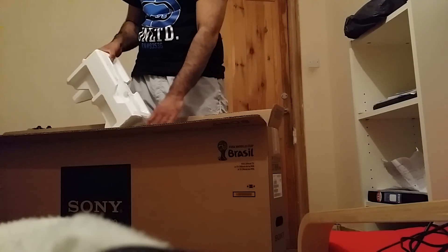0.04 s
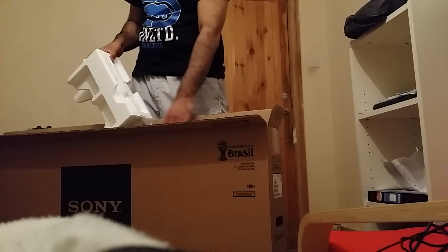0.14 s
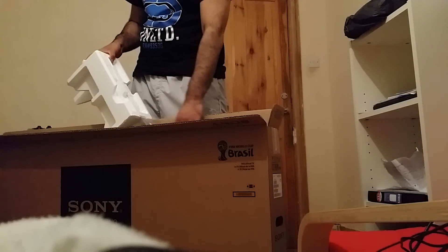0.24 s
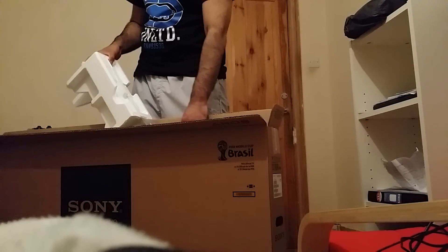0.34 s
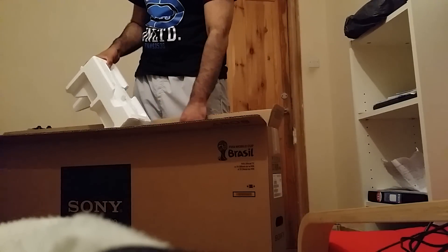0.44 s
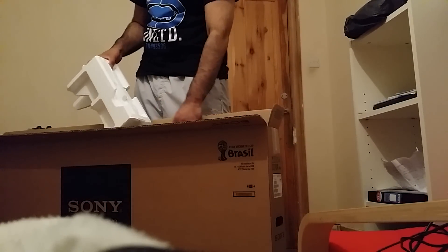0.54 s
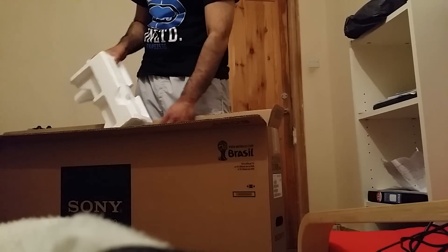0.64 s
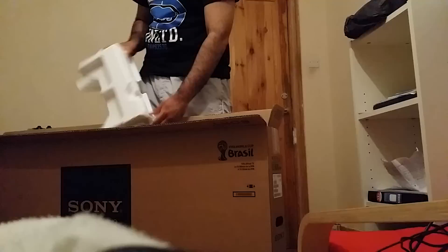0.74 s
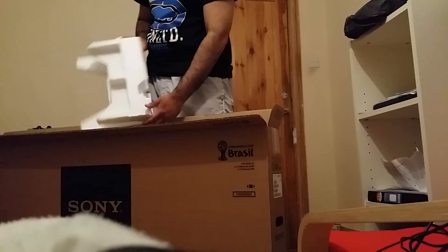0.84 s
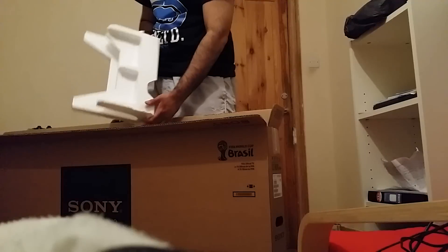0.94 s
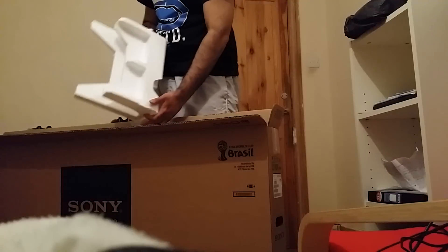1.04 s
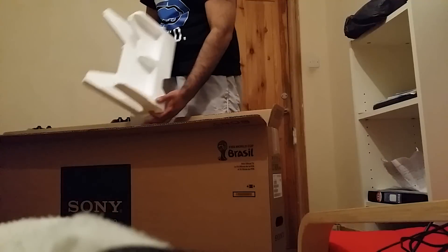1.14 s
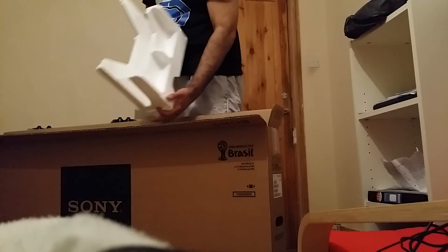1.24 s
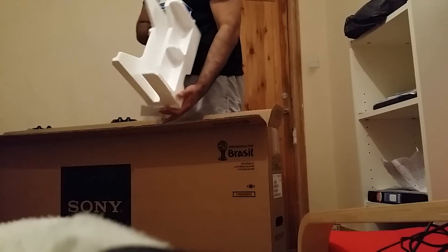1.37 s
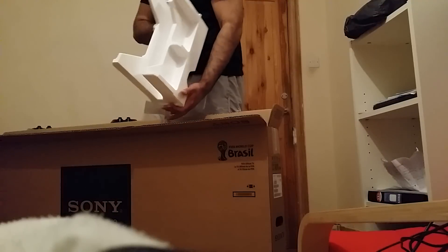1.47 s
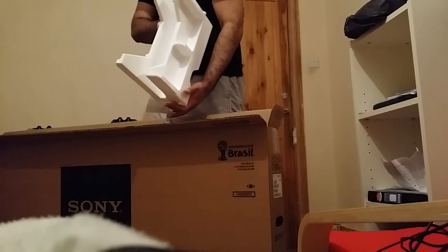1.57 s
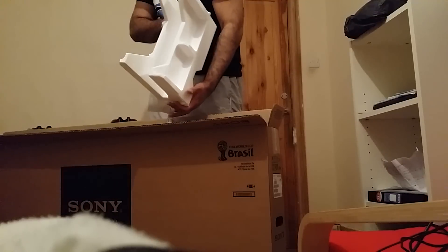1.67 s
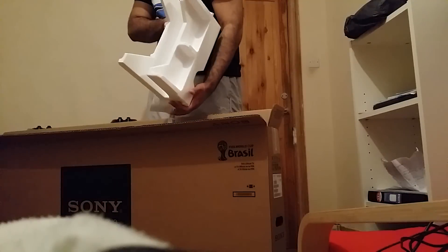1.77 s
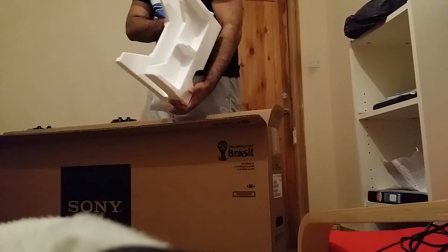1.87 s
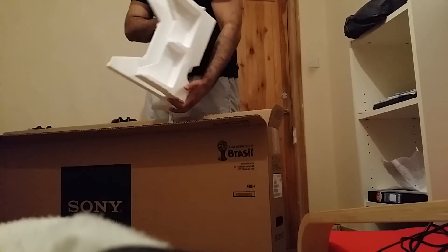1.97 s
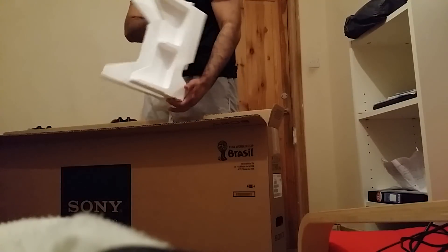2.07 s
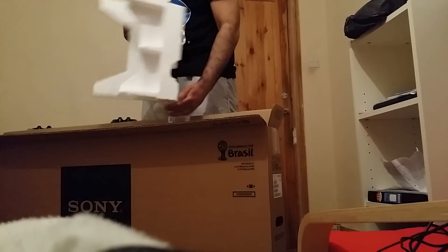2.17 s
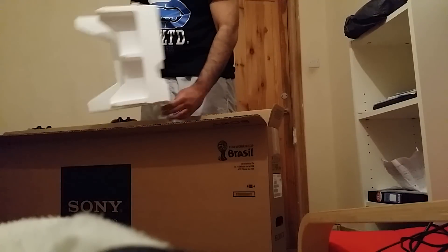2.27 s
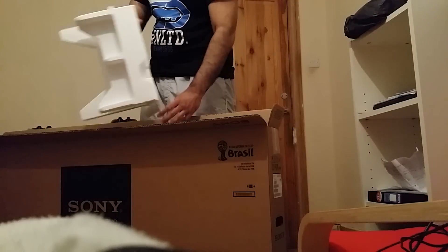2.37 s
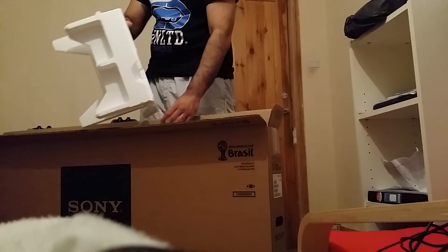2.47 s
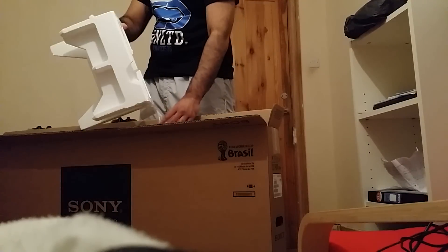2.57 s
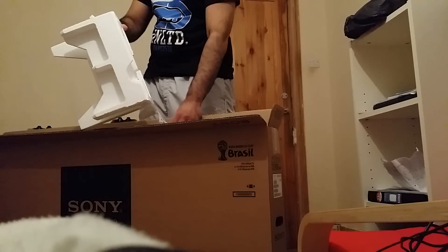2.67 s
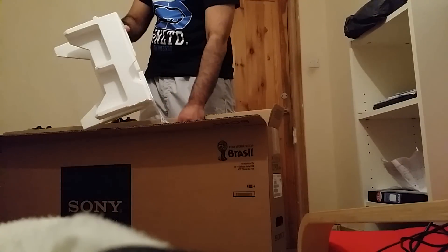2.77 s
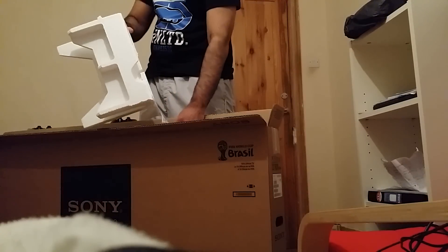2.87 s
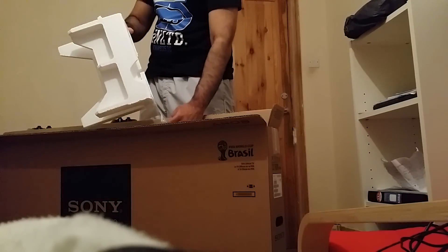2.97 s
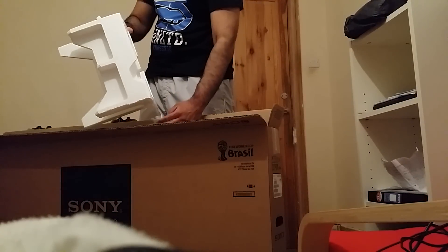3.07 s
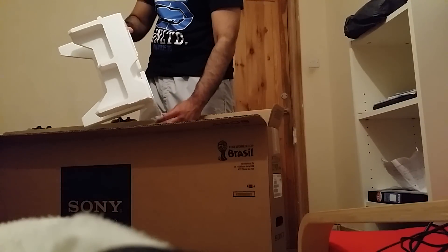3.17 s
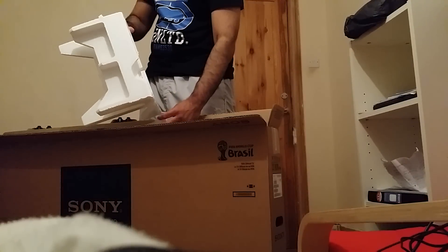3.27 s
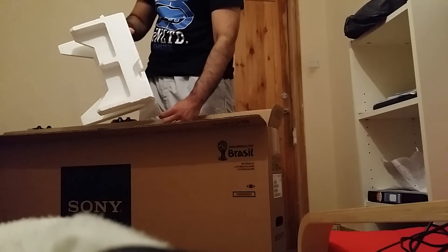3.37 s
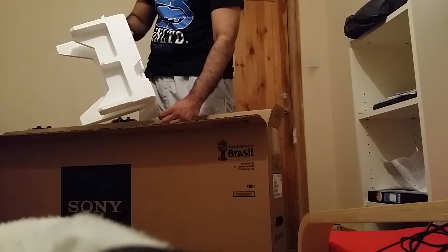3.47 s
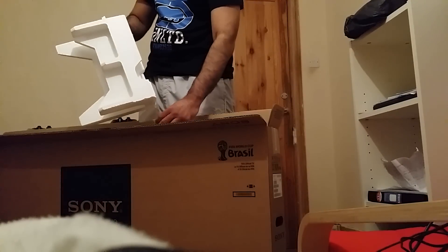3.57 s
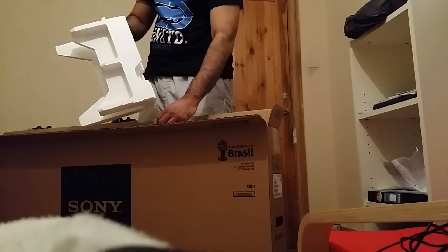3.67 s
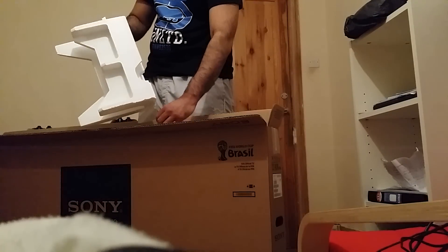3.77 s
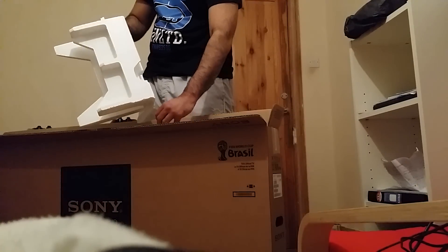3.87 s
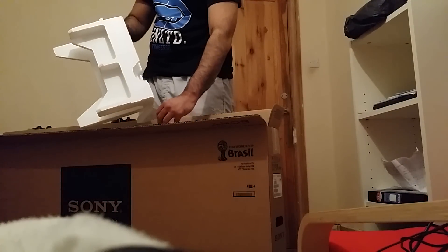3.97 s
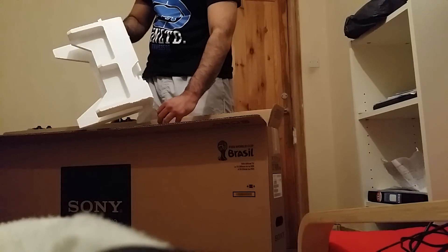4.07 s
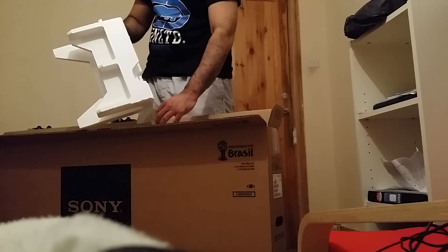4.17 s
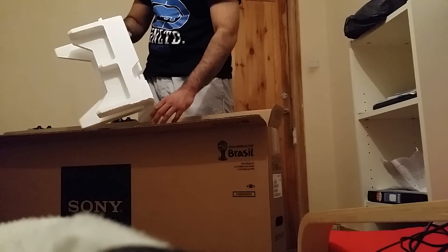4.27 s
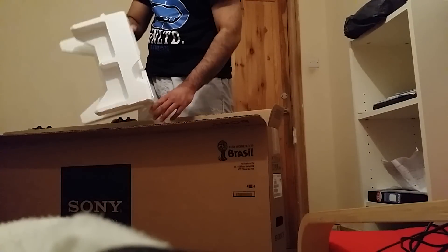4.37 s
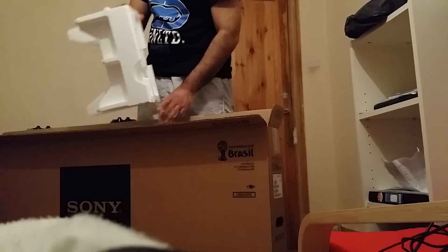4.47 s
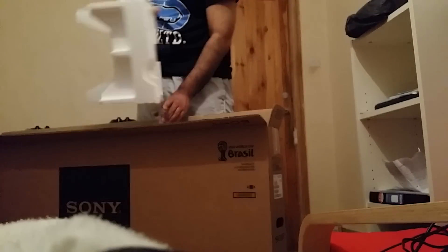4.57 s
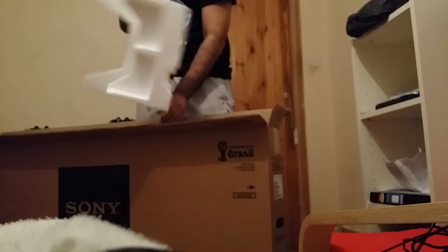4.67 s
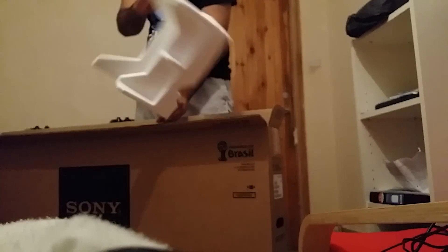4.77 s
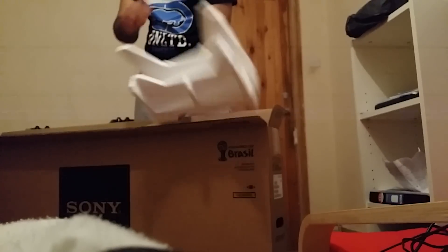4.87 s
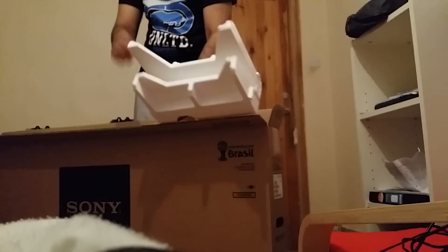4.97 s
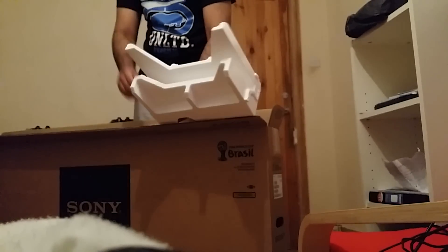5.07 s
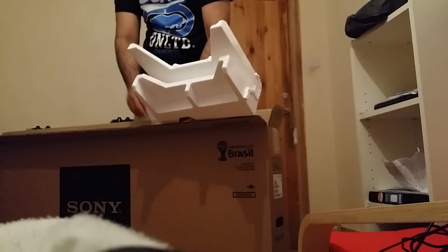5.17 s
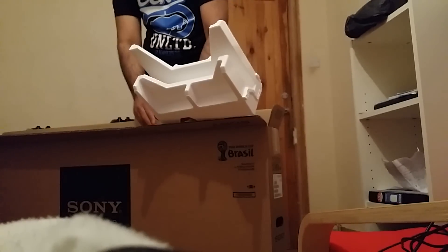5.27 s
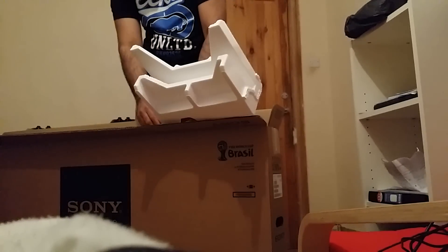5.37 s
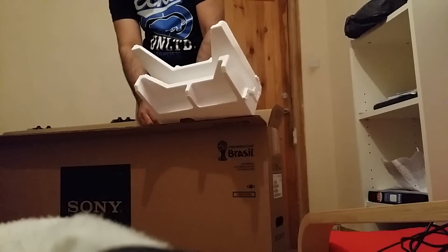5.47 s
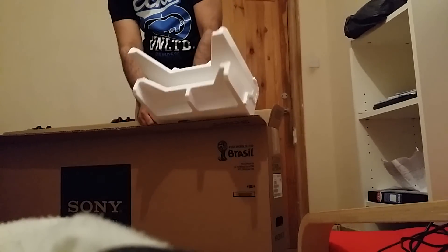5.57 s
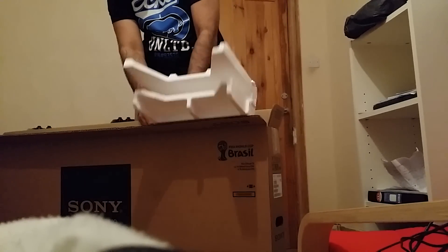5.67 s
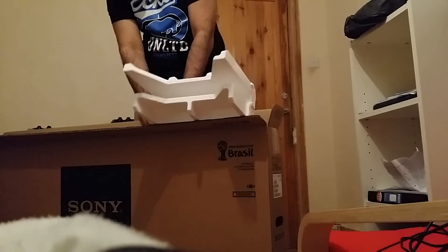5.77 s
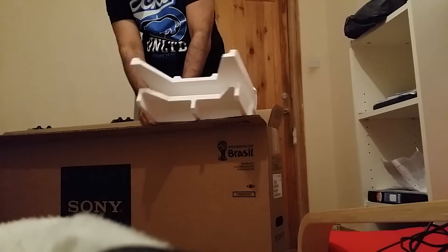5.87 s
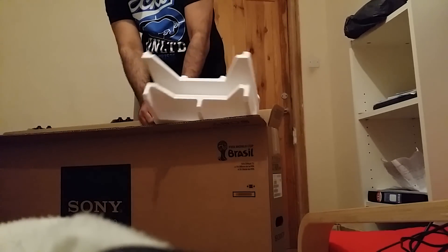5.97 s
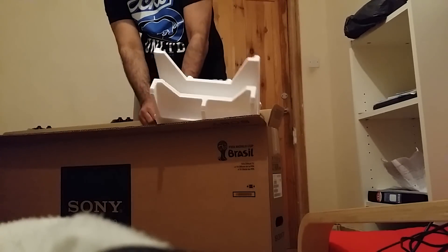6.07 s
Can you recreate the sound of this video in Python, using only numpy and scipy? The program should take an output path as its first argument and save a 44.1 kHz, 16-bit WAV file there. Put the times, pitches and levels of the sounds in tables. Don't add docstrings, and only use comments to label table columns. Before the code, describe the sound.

Dry foam handling: faint skin hiss and creaks first, then jerky scrapes over a cardboard rim, scattered sharp slaps and ticks, and brief rough squeaks. A pause of near quiet, more dragging, then a loud double knock of light foam on a hollow box with quick rebounds. Light hissing strokes follow. Small lively room, heard from a few metres, faint background air.

```python
import sys
import numpy as np
from scipy import signal
from scipy.fft import rfft, irfft, next_fast_len
from scipy.io import wavfile
from scipy.ndimage import uniform_filter1d, map_coordinates

SR = 44100
rng = np.random.default_rng(int(sys.argv[2]) if len(sys.argv) > 2 else 0)


def linear_from_db(decibels):
    return 10 ** (np.asarray(decibels, float) / 20)


def int16_out(signal):
    q = np.round(np.clip(np.atleast_2d(signal).T, -1, 1) * 32767)
    wavfile.write(sys.argv[1], SR, q.astype(np.int16))


N = 270050


def unit(x):
    return x / np.sqrt(np.mean(x ** 2))


def low_cut(x, order, hz):
    return signal.sosfilt(signal.butter(order, hz, "high", fs=SR, output="sos"), x)


def colour(x, points):
    size = next_fast_len(x.shape[-1])
    hz, db = np.transpose(points)
    bins_hz = np.maximum(np.fft.rfftfreq(size, 1 / SR), 1)
    gain = linear_from_db(np.interp(np.log(bins_hz), np.log(np.maximum(hz, 1)), db))
    return irfft(rfft(x, size) * gain, size)[..., :x.shape[-1]]


def ring(force, hz, t60_s):
    r = np.exp(-np.log(1000) / (max(t60_s, .002) * SR))
    w = 2 * np.pi * hz / SR
    return signal.lfilter([0, 2 * np.sqrt(1 - r) * np.sin(w)], [1, -2 * r * np.cos(w), r * r], force)


def walk(rate_hz):
    k = int(SR / rate_hz)
    held = np.repeat(rng.standard_normal(N // k + 1), k)
    return 1.22 * uniform_filter1d(uniform_filter1d(held, k), k)[:N]


def slips(rate_hz, spread_db, bed, judder_db):
    when, sign, size = rng.random((3, N))
    size_db = spread_db * np.minimum(-np.log(1 - size), 4.5)
    clicks = (when < rate_hz / SR) * np.sign(sign - .5) * linear_from_db(size_db)
    rough = unit(clicks) + bed * rng.standard_normal(N)
    return unit(rough * linear_from_db(judder_db * walk(45)))


# firm from in seconds, held in seconds, foam body in dB, centre of the ringing in Hz,
# skin hiss over body in dB.
SLIDES = [(0.0, 0.077, -59, 800, 0.5), (.22, 0.064, -60, 800, -11), (3.365, 0.014, -59, 900, 6.5),
          (.36, 0.16, -59, 704, 1.5), (.5, 0.037, -55.5, 800, 6.5), (.69, 0.018, -49.5, 770, 6),
          (.82, 0.2, -41.5, 560, 0.5), (1.13, .07, -62, 900, 10), (1.32, 0.17, -40.5, 940, 3.5),
          (1.55, 0.18, -49, 750, 4.5), (1.79, 0.12, -45.5, 830, 3.5), (1.98, 0.088, -43.5, 915, 5),
          (2.17, 0.048, -44.5, 670, 3.5), (2.3, 0.16, -46, 930, -2), (2.6, 0.061, -42.5, 900, -2),
          (2.72, 0.34, -49, 800, 0.5), (3.47, 0.13, -41.5, 860, -2.5), (3.75, 0.15, -58.5, 760, 5.5),
          (4.05, 0.16, -56.5, 750, 3), (4.25, 0.24, -47.5, 910, 0), (4.5, 0.044, -48, 1800, 0.5),
          (4.61, 0.026, -44, 850, 1), (4.71, 0.13, -41.5, 915, 3), (5.33, 0.052, -55, 1600, 4.5),
          (5.53, 0.33, -50.5, 1600, 6), (5.9, 0.13, -53, 890, -0.5)]
SLIDE_RISE_DB_S, SLIDE_FALL_DB_S = 124, 146
SLIDE_RASP_DB, SLIDE_BOOM_DB = -5, -11
# firm from in seconds, held in seconds, foam body in dB, centre of the ringing in Hz,
# box boom over body in dB.
DRAGS = [(.15, 0.026, -54, 990, -8), (.77, 0.11, -48.5, 555, -1), (0.919, 0.01, -43.5, 560, 11),
         (1.001, 0.028, -36.5, 1050, -3), (2.468, 0.01, -32.5, 890, -15), (2.539, 0.01, -31, 1040, -34),
         (3.132, 0.023, -28.5, 950, -23), (4.24, 0.011, -49, 1130, -4), (4.47, 0.059, -39.5, 476, -17),
         (5.018, 0.035, -36, 720, 6.5), (5.1, .12, -45.5, 400, -3)]
DRAG_RISE_DB_S, DRAG_FALL_DB_S = 319, 339
DRAG_RASP_DB, DRAG_HISS_DB = -6.5, -4.5


def handling():
    t = np.arange(0, N + 64, 64) / SR
    power = np.full((5, len(t)), 1e-12)  # body, rasp, hiss, boom, power-weighted Hz
    strokes = []
    for *stroke, hiss_db in SLIDES:
        layers_db = (0, SLIDE_RASP_DB, hiss_db, SLIDE_BOOM_DB)
        strokes.append((stroke, SLIDE_RISE_DB_S, SLIDE_FALL_DB_S, layers_db))
    for *stroke, boom_db in DRAGS:
        layers_db = (0, DRAG_RASP_DB, DRAG_HISS_DB, boom_db)
        strokes.append((stroke, DRAG_RISE_DB_S, DRAG_FALL_DB_S, layers_db))
    for (s, held_s, db, hz), rise, fall, layers_db in strokes:
        press_db = db - rise * np.maximum(s - t, 0) - fall * np.maximum(t - s - held_s, 0)
        power += np.append(linear_from_db(layers_db) ** 2, hz)[:, None] * linear_from_db(2 * press_db)
    place_hz = np.maximum(power[4] / power[0], 300)
    controls = [*10 * np.log10(power[:4]), place_hz]
    return [np.interp(np.arange(N) / SR, t, c) for c in controls]


# start in seconds, peak in dB, ringing centre in Hz, crackle in dB.
SLAPS = [(0.124, -30, 1000, -12), (0.293, -48, 1090, -6), (0.308, -42.5, 1100, -8), (0.347, -46, 780, -3.5),
         (1.554, -18, 800, -10), (1.661, -30.5, 744, -10.5), (1.775, -18, 650, -12), (1.823, -25, 940, -38),
         (2.166, -35, 678, -7), (2.565, -31, 754, -29), (2.826, -39, 490, -3.5), (3.152, -13, 960, -8.5),
         (3.4055, -32.5, 935, -13), (3.682, -29.5, 856, -11.5), (4.149, -33.5, 727, -6.5),
         (5.852, -36.5, 1430, -29)]
# start in seconds, peak in dB, ringing centre in Hz, crackle in dB.
JERKS = [(0.539, -46.5, 1400, 5), (0.797, -20.5, 331, -30), (0.897, -20, 331, -6.5),
         (0.916, -27, 624, -4.5), (1.0, -22, 1390, -2.5), (1.024, -30.5, 1410, -2),
         (1.254, -31.5, 830, -11), (2.053, -31, 980, -10), (2.278, -23.5, 1510, -21),
         (2.337, -17, 930, -24), (2.366, -28, 990, -18), (2.672, -20, 625, -18), (2.459, -28.5, 886, -8),
         (2.537, -19.5, 2310, -10), (2.546, -15, 1240, -20), (2.953, -36, 890, -8),
         (3.636, -36.5, 1320, -3), (4.188, -34, 614, -8.5), (4.227, -34.5, 1040, -14),
         (4.842, -22, 1390, -2), (4.939, -27, 1500, -6), (4.974, -25, 1000, 4.5), (5.157, -28.5, 500, -8),
         (5.413, -62, 820, -8)]
# start in seconds, peak in dB, ringing centre in Hz, crackle in dB.
SKIDS = [(0.453, -45.5, 360, -1.5), (0.662, -36, 719, -3), (0.76, -37, 417, -23), (1.296, -35, 1010, -9),
         (1.459, -45, 845, -19), (2.48, -31, 590, -30), (3.078, -34, 1400, -14), (3.095, -21.5, 1680, -14),
         (3.52, -26, 890, -17), (3.955, -41.5, 579, -9), (4.395, -29, 453, -14), (4.43, -33.5, 420, -14),
         (4.49, -32, 1700, -8), (4.495, -33, 3400, -12), (4.695, -34.5, 1000, -2), (4.75, -30, 748, -10)]
# start in seconds, peak in dB, ringing centre
# in Hz, crackle in dB.
TAPS = [(2.482, -29, 600, -26), (2.446, -34, 904, -12), (3.473, -32, 830, -22), (3.084, -32, 1230, -20),
        (3.522, -38, 974, -22), (3.227, -32, 1000, -20), (3.571, -32, 820, -16), (3.59, -32.5, 470, -12),
        (3.828, -41, 930, -14), (2.674, -27, 730, -12), (2.343, -28, 730, -27), (2.375, -32.5, 670, -25),
        (1.781, -28, 900, -8), (4.056, -43, 500, -17), (3.159, -15, 4000, -10), (3.165, -23, 5100, -17),
        (3.096, -33.5, 1700, -5), (4.089, -43, 1200, -14), (2.556, -21, 2300, -16), (2.564, -24, 720, -16),
        (5.983, -42, 800, -8), (4.977, -31, 1200, -3), (6.072, -44, 2100, -8), (0.805, -34, 960, -12),
        (0.903, -32, 750, -10), (4.858, -27, 900, -8)]
SLAP_S, JERK_S, SKID_S = 0.0027, 0.0091, 0.02
BOOM_DB, BOOM_AT_DB, BOOM_GROWTH, BOOM_DB_PER_OCTAVE = -47.5, -32.5, 0.36, -7


def grips():
    rows = []
    for table, slip_s in ((SLAPS, SLAP_S), (JERKS, JERK_S), (SKIDS, SKID_S), (TAPS, SLAP_S)):
        for s, db, hz, crackle_db in table:
            boom_db = BOOM_DB + BOOM_GROWTH * (db - BOOM_AT_DB) + BOOM_DB_PER_OCTAVE * np.log2(hz / 800)
            rows.append((s, db, hz, crackle_db, boom_db - db, slip_s))
    return rows


SNAP_DB = 26


def bursts(db, chatter, snap_db=-60, lead_s=.001, spread_s=1e-5):
    out = np.zeros(N)
    t = np.arange(SR // 7) / SR
    splinters = rng.choice([-1, 1], (96, 128)) * np.exp(-t[:128] / spread_s)
    splinters *= splinters[:, :1] / np.linalg.norm(splinters, axis=1, keepdims=True)
    for (s, *_, slip_s), size, snap in zip(grips(), linear_from_db(db), splinters):
        i = int((s - lead_s) * SR)
        span_s = np.clip(slip_s, .001, .03)
        fade = np.exp(-t / span_s) * np.minimum(t / span_s ** 2 / 25, 1)
        out[i:i + len(t)] += size * chatter[i:i + len(t)] * fade[:N - i]
        out[i:i + len(snap)] += snap * size * linear_from_db(snap_db) * np.exp(-(span_s / .008) ** 4)
    return out


# frequency in Hz, level in dB, t60 in seconds.
FOAM = [(384, -1, 0.0061), (402, 4, 0.028), (477, -5, 0.049), (603.3, 0, 0.066), (678, -8.5, 0.049),
        (735, -0.5, 0.033), (866, -2, 0.023), (946, 1, 0.047), (1040, -0.5, 0.021), (1142, -0.5, 0.043),
        (1237, -2, 0.053), (1373, 1.5, 0.016), (1580, -1, 0.015), (1700, -1.5, 0.02), (1878, -2, 0.009),
        (2260, -7, 0.0045), (2700, -5, .004), (3170, -4.5, 0.003), (3880, -6, .0022)]


def foam(body_db, place_hz):
    _, peak_db, centre_hz, *_ = np.transpose(grips())
    rub = slips(1100, 2.6, .9, 2)
    catch = slips(4000, 2, 1.5, 0)
    out = 0
    for k, (hz, db, t60_s) in enumerate(FOAM):
        rub_db = body_db - 11.0 - 4.3 * np.abs(np.log2(hz / place_hz)) + 1.4 * walk(10)
        share_db = -9 * np.abs(np.log2(hz / centre_hz)) + 1.26 * rng.standard_normal(len(peak_db))
        force = rub * linear_from_db(rub_db) + bursts(peak_db + share_db - 11.5, catch, snap_db=SNAP_DB - 4)
        out = out + (-1) ** k * linear_from_db(db) * ring(force, hz, t60_s)
    return low_cut(out, 4, 290)


# frequency in Hz, density in dB per Hz.
RASP = [(1000, -22), (1700, 1.5), (2000, -6), (3020, -3.5), (4900, -16.5), (6370, -19), (10800, -120)]
HISS = [(2710, -10), (4600, -1), (6130, -1.5), (6700, 2), (8580, -3), (10700, -5.5), (14000, -10.5),
        (14600, -17), (15000, -38)]
CRACKLE = [(1100, -14), (1900, 0.5), (3500, 1), (5200, 0.5), (7000, 4.5), (9000, -5), (12000, -8.5),
           (14500, -19), (15600, -37), (16500, -60)]


def surface(rasp_db, hiss_db):
    _, peak_db, _, crackle_db, *_ = np.transpose(grips())
    rasp = unit(colour(slips(1200, 3.5, .9, 2.5), RASP))
    hiss = unit(colour(slips(2000, 3.5, 1, 2.2), HISS))
    chatter = slips(5000, 2.5, 1.2, 0)
    force = bursts(peak_db + crackle_db - 4.5, chatter, snap_db=SNAP_DB, lead_s=0)
    return rasp * linear_from_db(rasp_db - 10.0) + hiss * linear_from_db(hiss_db - 12.0) + colour(force, CRACKLE)


def ticks(rasp_db):
    tick_db = -14
    return unit(colour(slips(260, 4, .05, 3), CRACKLE)) * linear_from_db(rasp_db + tick_db)


# frequency in Hz, density in dB per Hz.
SNAP = [(1100, -20), (2500, -6), (7000, 6.5), (10000, -1.5), (14300, 0), (15000, 11), (15800, 8),
        (16400, -38)]


def snaps():
    _, peak_db, _, crackle_db, *_ = np.transpose(grips())
    silent = np.zeros(N)
    clicks = bursts(peak_db + crackle_db - 4, silent, snap_db=SNAP_DB, lead_s=0, spread_s=0.0008)
    return colour(clicks, SNAP)


# start in seconds, length in seconds, level in dB, frequency in Hz.
SQUEAKS = [(1.0, 0.045, -41, 1486), (1.295, 0.1, -48, 970), (1.395, 0.06, -56, 990), (4.59, .05, -50, 938),
           (4.815, 0.062, -45, 900), (4.842, 0.03, -44, 1450), (2.28, 0.033, -47, 1560),
           (2.351, .05, -42, 980), (3.152, 0.013, -27.5, 961), (4.892, .03, -56, 943),
           (5.404, 0.028, -63, 870), (5.06, .05, -40, 760), (4.745, .03, -46, 800)]
SQUEAK_T60_S, SQUEAK_STEADY = 0.05, 0.09


def squeaks():
    t = np.arange(N) / SR
    jitter = rng.standard_normal(N)
    out = 0
    for s, length_s, db, hz in SQUEAKS:
        force = 0.45 * jitter + SQUEAK_STEADY * np.sin(2 * np.pi * hz * t)
        swell = np.sin(np.pi * np.clip((t - s) / length_s, 0, 1)) ** .5
        out = out + linear_from_db(db) * ring(force * swell, hz, SQUEAK_T60_S)
    return out


# start in seconds, peak in dB.
KNOCK = [
    (4.9955, -1),
    (5.0005, -2.5),
    (5.0125, -4.5),
    (5.037, -10),
    (5.0512, -13),
    (5.07, -25),
    (5.083, -24),
    (5.098, -25),
    (5.118, -30),
    (5.137, -32),
]
# frequency in Hz, level in dB, t60 in seconds.
KNOCK_MODES = [(280, -7.5, 0.16), (359.6, -9, 0.16), (420, -12.5, 0.21), (598, -11, 0.51), (670, -5, 0.072),
               (754, -10, 0.86), (880, 2.5, 0.068), (1006, 2.5, 0.082), (1130, -5.5, 0.043),
               (1240, 1.5, 0.089), (1290, -30, 0.4), (1393, -3.5, 0.091), (1668, -17, 0.38),
               (1880, -10.5, 0.14), (1880, -34, 0.25), (1960, -44, 0.91), (2700, -14, 0.28),
               (2977, -22, 0.26)]


def knock():
    contact_s, ring_share = 0.00065, 0.16
    force = np.zeros(N)
    for s, db in KNOCK:
        force[int(s * SR)] = linear_from_db(db)
    push = np.sin(np.pi * np.clip(np.arange(64) / SR / contact_s, 0, 1)) ** 2
    force = np.convolve(force, push / push.sum())[:N]
    body = 0
    for k, (hz, db, t60_s) in enumerate(KNOCK_MODES):
        body = body + (-1) ** k * linear_from_db(db) * ring(force, hz, ring_share * t60_s) * np.sqrt(t60_s)
    crack = linear_from_db(21.0) * np.gradient(force)
    return linear_from_db(22.5) * body + crack


# frequency in Hz, level in dB, t60 in seconds.
BOX = [(67, -9, 0.17), (113.7, -3.5, 0.054), (155, -0.5, 0.038), (196.7, -3, 0.072), (209, -3.5, 0.087),
       (280, 1, 0.021)]


def box(boom_db):
    _, peak_db, _, _, thud_db, _ = np.transpose(grips())
    shake = slips(400, 1.2, 3.2, 1.3)
    force = shake * linear_from_db(boom_db - 7.0) + bursts(peak_db + thud_db - 11.5, shake)
    out = 0
    for k, (hz, db, t60_s) in enumerate(BOX):
        out = out + (-1) ** k * linear_from_db(db) * ring(force * linear_from_db(2 * walk(7)), hz, t60_s)
    return low_cut(out, 2, 55)


# start in seconds, peak in dB.
THUMPS = [
    (.52, -51),
    (.82, -36),
    (2.27, -56),
    (2.5, -52),
    (2.83, -50),
    (4.36, -54),
    (4.7, -54),
    (5.031, -37),
]
THUMP_HZ, THUMP_RISE_S, THUMP_T60_S = 71.4, 0.045, 0.23
# start in seconds, peak in dB, frequency in Hz.
PANEL = [(0.0, -57, 166), (0.759, -44.5, 194), (0.791, -36, 280), (1.775, -46, 152), (1.78, -44, 260),
         (2.5, -46, 340), (2.84, -50, 160), (2.94, -57, 148), (5.842, -55, 148), (.908, -22, 182),
         (.96, -39, 190), (0.989, -36, 246), (2.043, -44.5, 156), (4.23, -44, 250), (4.514, -35, 370),
         (4.995, -26.5, 155), (5.14, -36, 229), (5.17, -41, 287), (5.2, -46, 318), (5.105, -32, 420),
         (5.215, -56, 376)]
PANEL_RISE_S, PANEL_T60_S = 0.015, 0.059


def bumps():
    out = np.zeros(N + SR)
    t = np.arange(SR // 2) / SR
    rows = [(s, db, THUMP_HZ, THUMP_RISE_S, THUMP_T60_S) for s, db in THUMPS]
    rows += [(s, db, hz, PANEL_RISE_S, PANEL_T60_S) for s, db, hz in PANEL]
    for s, db, hz, rise_s, t60_s in rows:
        i = int(max(s, 0) * SR)
        swell = np.sin(np.pi / 2 * np.minimum(t / rise_s, 1)) ** 2
        fade = np.exp(-np.log(1000) * np.maximum(t - rise_s, 0) / t60_s)
        out[i:i + len(t)] += linear_from_db(db) * swell * fade * np.sin(2 * np.pi * hz * t)
    return out[:N] * linear_from_db(1.6 * walk(29.98))


# frequency in Hz, t60 in seconds, tail over direct in dB.
ROOM = [(60.3, 0.28, -12), (250, 0.28, 1), (800, 0.23, 0.5), (1500, 0.22, 0), (2470, 0.19, 11),
        (7100, 0.26, 12), (14800, 0.17, 13.5)]


def room(x):
    gap_s, alike_hz, count = 0.0022, 1400, 32
    places = 18 * count
    size, hop = next_fast_len(SR // 3), N // (places - 1) + 1
    t = np.arange(size) / SR
    tails = np.zeros((count, 2, size))
    noise = rfft(rng.standard_normal((count, 2, size)))
    hz, t60_s, wet_db = np.transpose(ROOM)
    sides = np.array([[1], [-1]])
    for centre_hz in 40 * 2. ** np.arange(10):
        octaves = np.log2(np.maximum(np.fft.rfftfreq(size, 1 / SR), 1) / centre_hz)
        band = irfft(noise * np.cos(np.pi / 2 * np.clip(octaves, -1, 1)) ** 2, size)
        band_t60_s = np.interp(np.log(centre_hz), np.log(hz), t60_s)
        decay = np.exp(-np.log(1000) * t / band_t60_s) * np.clip(t / gap_s - .5, 0, 1)
        decay *= linear_from_db(np.interp(np.log(centre_hz), np.log(hz), wet_db)) / np.sqrt(np.sum(decay ** 2))
        apart = np.clip((centre_hz / alike_hz) ** 0.76, .3, 1)
        tails += decay * (band[:, :1] + apart * band[:, 1:] * sides) / np.sqrt(1 + apart ** 2)
    out = np.zeros((2, (places + 1) * hop + size))
    fade = np.sqrt(np.hanning(2 * hop))
    padded = np.pad(x, (hop, 2 * hop))
    reach = next_fast_len(size + 2 * hop)
    tails = rfft(tails, reach)
    for k in range(places):
        source = rfft(padded[k * hop:(k + 2) * hop] * fade, reach)
        part = irfft(source * tails[k % count], reach)[:, :size + hop]
        out[:, k * hop:k * hop + part.shape[1]] += part
    return low_cut(out[:, hop:hop + N], 2, 55)


# frequency in Hz, density in dB per Hz.
QUIET = [(15, -43), (25, -13), (354, -4), (488, -9), (621, 2), (729, -14), (1960, -17), (2130, -9),
         (2300, -21), (5570, -23), (6900, -16), (15000, -28)]
QUIET_DB = -56


def quiet():
    mid, side = colour(rng.standard_normal((2, N)), QUIET)
    return linear_from_db(QUIET_DB - 4) * unit(mid + .8 * side * np.array([[1], [-1]]))


def scene():
    port_lag_s = .0001
    body_db, rasp_db, hiss_db, boom_db, place_hz = handling()
    spread = foam(body_db, place_hz) + surface(rasp_db, hiss_db) + box(boom_db) + bumps() + squeaks()
    blow = knock()
    near = spread + blow + snaps() + ticks(rasp_db)
    late = map_coordinates(near, [np.arange(N) - port_lag_s * SR], order=3)
    wall = linear_from_db(-7.0) * np.array([np.roll(near, int(.0061 * SR)), np.roll(near, int(.0059 * SR))])
    return np.array([near, late]) + wall + room(spread + linear_from_db(-5.0) * blow) + quiet()


# frequency in Hz, left minus right in dB.
PORTS = [(60, -1.5), (110, -6.5), (200, -2), (380, -4), (700, -4), (1290, -3.5), (2380, -4.5), (4390, -0.5),
         (8100, 0.5), (15000, -3)]


def ports(dry):
    half = np.array(PORTS) * [1, .5]
    return np.array([colour(dry[0], half), colour(dry[1], half * [1, -1])])


def top_cut(x):
    return signal.sosfilt(signal.butter(12, 15790, fs=SR, output="sos"), x)


def record(dry):
    rounded = np.tanh(.8 * ports(dry)) / .8
    mix = signal.sosfilt(signal.ellip(6, .5, 27, 14500, fs=SR, output="sos"), rounded)
    return top_cut(mix)


dry = scene()
out = record(dry)
int16_out(out)
```